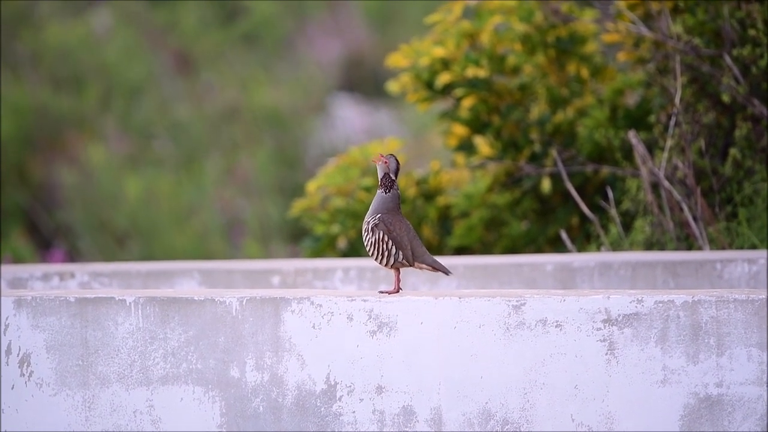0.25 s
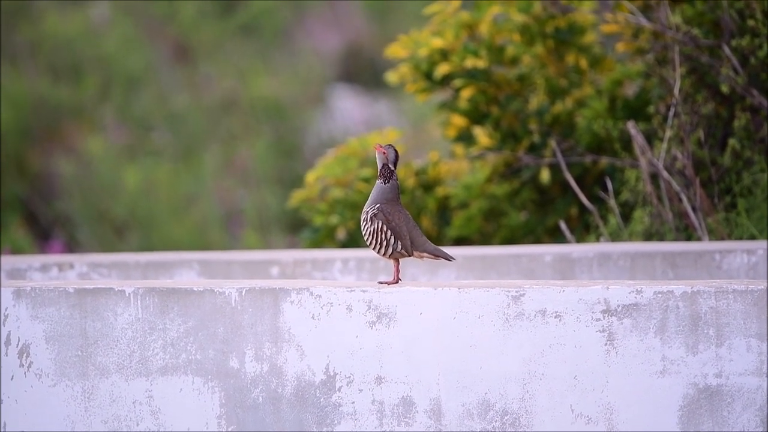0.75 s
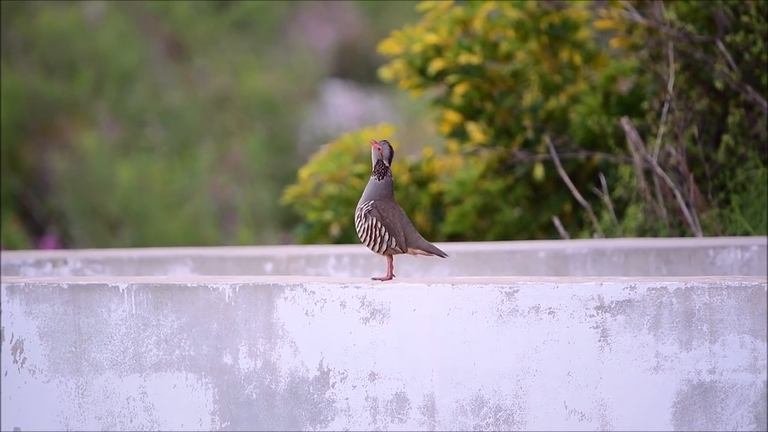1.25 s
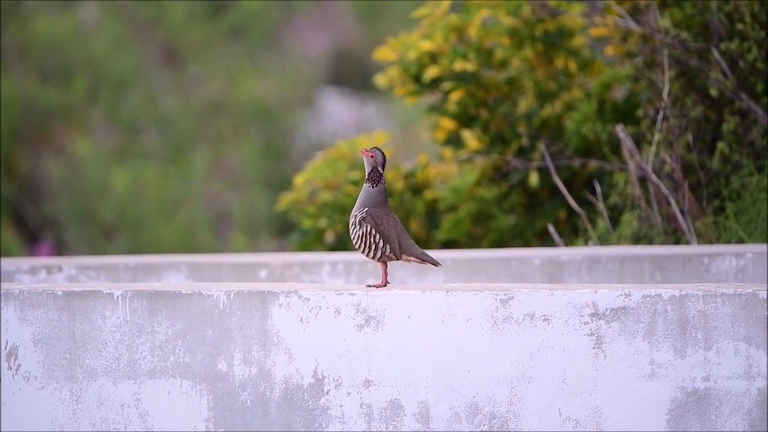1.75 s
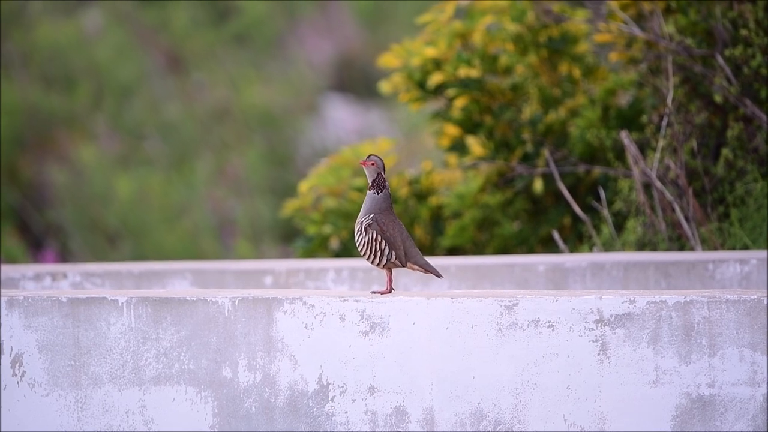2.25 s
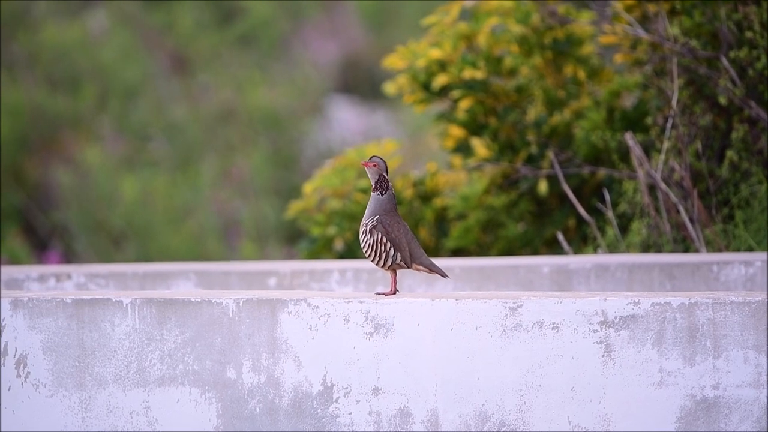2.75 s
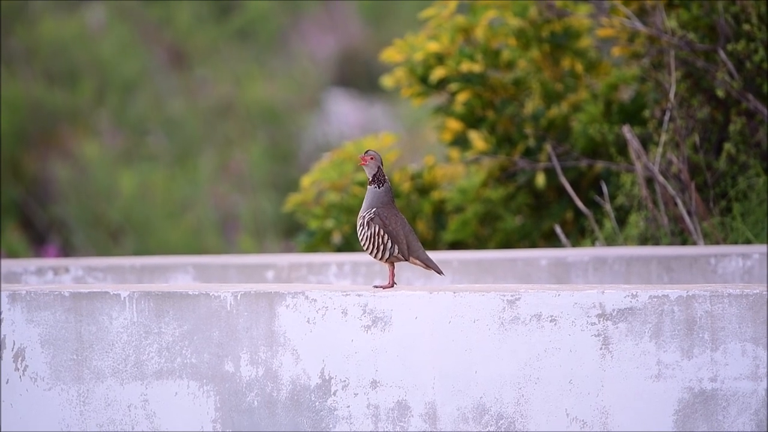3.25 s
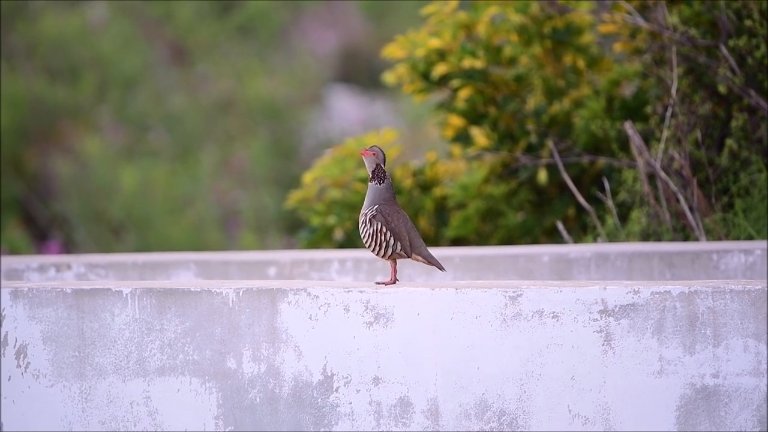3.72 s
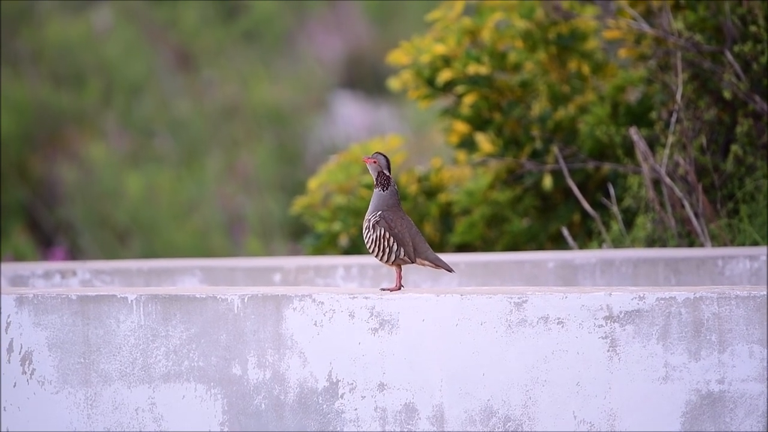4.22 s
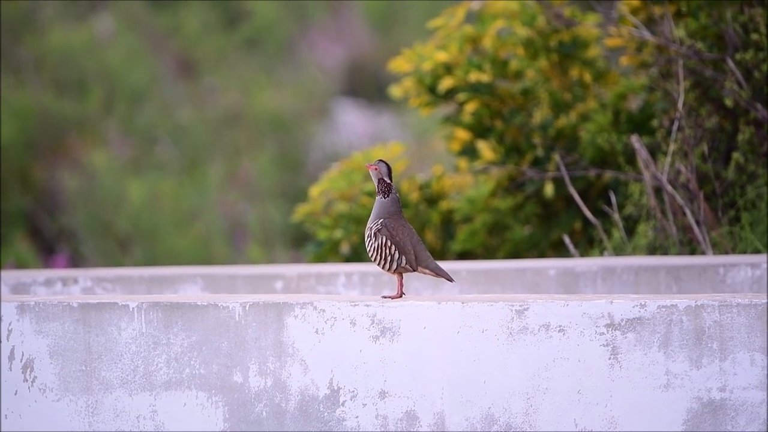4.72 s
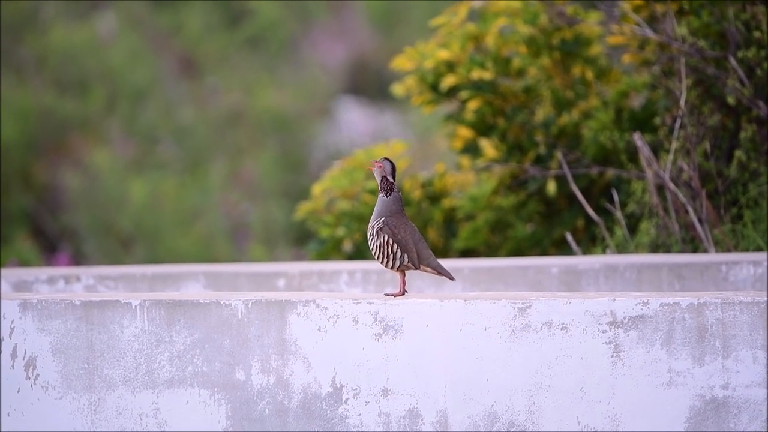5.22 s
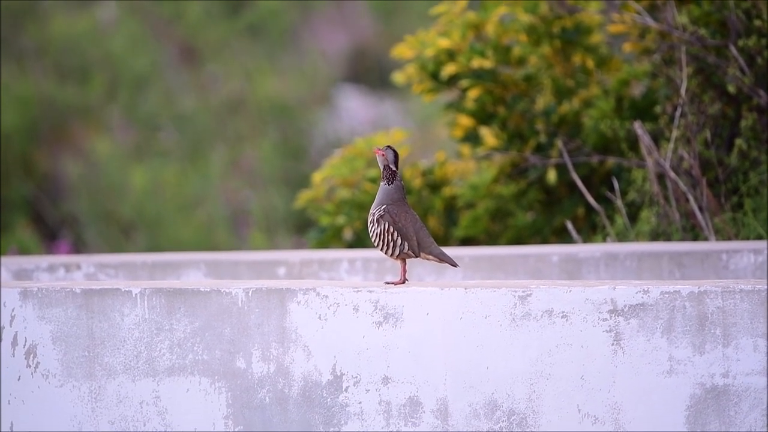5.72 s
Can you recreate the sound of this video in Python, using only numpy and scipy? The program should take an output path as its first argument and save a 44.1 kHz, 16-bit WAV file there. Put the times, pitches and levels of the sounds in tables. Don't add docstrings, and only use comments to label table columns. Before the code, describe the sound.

Outdoors, a partridge gives regular harsh rasp-and-whistle calls with ringing echoes over quiet road hum, hiss and a thin high whine.

```python
import sys
import numpy as np
from scipy import signal
from scipy.fft import rfft, irfft, next_fast_len
from scipy.io import wavfile
from scipy.ndimage import uniform_filter1d, map_coordinates

SR = 44100
rng = np.random.default_rng(int(sys.argv[2]) if len(sys.argv) > 2 else 0)


def waveform_to_disk(signal):
    frames = np.transpose(np.atleast_2d(signal))
    scaled = np.clip(frames, -1, 1) * 32767
    samples = np.round(scaled).astype(np.int16)
    wavfile.write(sys.argv[1], SR, samples)


def natural_amplitude(level_db):
    exponent = np.asarray(level_db, float) / 20
    return 10 ** exponent


N = 263718
LEAD = SR // 4

# f/Hz, level/dB
GRIP_COLOUR = [(5000, 3), (8500, -7), (11000, -8), (13500, 3), (15500, -20)]


def unit(x):
    return x / np.sqrt(np.mean(x ** 2) + 1e-20)


def along(points, hz):
    f, v = np.transpose(points)
    return np.interp(np.log(hz + 1), np.log(f + 1), v)


def filtered(x, response):
    n = x.shape[-1]
    m = next_fast_len(n + 4096)
    return irfft(rfft(x, m) * response(np.fft.rfftfreq(m, 1 / SR)), m)[..., :n]


def resonances(modes, f):
    total = 0
    for k, (centre, width, db) in enumerate(modes):
        total = total + (-1) ** k * natural_amplitude(db) * 1j * f * width / (centre * centre - f * f + 1j * f * width)
    return total


def wobble(rate, size):
    knots = rng.standard_normal(int(size * rate / SR) + 4)
    return map_coordinates(knots, [np.arange(size) * rate / SR])


def left_right(left, right):
    return np.array([[left], [right]])


def add(track, s, sound):
    part = track[..., LEAD + round(s * SR):][..., :sound.shape[-1]]
    part += sound[..., :part.shape[-1]]


def rush(spectrum, patchy_db):
    # f/Hz, correlation
    alike = [(60, 0.9), (130, 0.9), (290, 0.76), (640, 0.6), (1410, -0.019), (3100, -0.21), (6820, 0.013),
             (15000, 0.0068)]
    # f/Hz, level/dB
    tilt = [(60, 0), (110, -1.5), (200, -1.5), (380, -2), (700, -3), (1290, -11.5), (2380, -2.5),
            (4400, -1.5), (8120, 0), (15000, -2)]
    z = signal.stft(rng.standard_normal((2, N)), nperseg=512)[2]
    field = uniform_filter1d(rng.standard_normal(z.shape[1:]), size=5, axis=0)
    field = uniform_filter1d(field, size=14, axis=1)
    pair = signal.istft(z * natural_amplitude(patchy_db * unit(field)), nperseg=512)[1][:, :N]

    def mid_side(hz):
        turn = np.arccos(np.clip(along(alike, hz), -1, 1)) / 2
        return natural_amplitude(along(spectrum, hz)) * [np.cos(turn), np.sin(turn)]

    mid, side = filtered(pair, mid_side)
    lean = lambda hz: natural_amplitude(np.outer([.5, -.5], along(tilt, hz)))
    return unit(filtered(np.array([mid + side, mid - side]), lean))


def traffic():
    # f/Hz, level/dB per Hz
    hum_spectrum = [(15, -13), (40, -4), (65, -5), (115, -5.5), (170, -4), (295, -4.5), (400, -8.5),
                    (680, -6.5), (900, -10), (1180, -11), (1300, -3), (1520, -4), (1620, -45), (2200, -120)]
    # f/Hz, level/dB per Hz
    hiss_spectrum = [(1000, -69), (1550, 2), (2200, -1), (3200, -4.5), (5000, -5), (7000, -14),
                     (11000, -16), (13800, -16), (14700, -21), (15100, -8), (15600, -17)]
    # t/s, level/dB
    road = [(0, -48.5), (1, -50), (2, -49), (3, -48.5), (4, -49), (6, -49.5)]
    s, road_db = np.transpose(road)
    swell = natural_amplitude(np.interp(np.arange(N) / SR, s, road_db))
    hum = rush(hum_spectrum, patchy_db=1.0)
    low = filtered(hum, lambda f: 1 / (1 + (f / 450) ** 4))
    layers = natural_amplitude(-0.8) * unit(low) + natural_amplitude(3.5) * unit(hum - low)
    return swell * layers + natural_amplitude(-56.0) * rush(hiss_spectrum, patchy_db=.5)


def drones():
    # f/Hz, width/Hz, level/dB
    road_tones = [(114.2, 23, -55.5), (290.4, 14.6, -61.5), (691, 44.5, -54.5), (878, 11, -74),
                  (1059.5, 40, -58.5)]

    def bands(f):
        return sum(natural_amplitude(db) * np.sqrt(1500 / w) * np.exp(-((f - hz) / w) ** 2) for hz, w, db in road_tones)

    return filtered(rush([(50, 0), (1500, 0), (1600, -120)], patchy_db=2), bands)


def whine():
    # f/Hz, level/dB rms
    tones = [(15635, -54.5)]
    hz, db = tones[0]
    phase = 2 * np.pi * hz * np.arange(N) / SR + .1 * wobble(20, N)
    level = natural_amplitude(db + 0.3 * wobble(0.39, N) + .35 * wobble(130, N))
    return np.sqrt(2) * level * natural_amplitude(left_right(2.9, -4.2)) * np.sin(phase + left_right(.25, -.25))


def handling():
    # t/s, peak level/dB, f/Hz, t60/s, left minus right/dB
    knocks = [
        (3.4241, -31, 1474, 0.027, -25),
        (3.456, -21.5, 1330, 0.0048, -36),
        (3.491, -22, 1460, 0.024, -24.5),
        (5.8165, -34, 1330, 0.039, -18),
    ]
    # t/s, peak level/dB, left minus right/dB
    ticks = [
        (3.425, -37, -13),
        (3.454, -46, -8),
        (3.461, -43, -8),
        (3.481, -36, -17),
    ]
    # start t/s, length/s, level/dB
    stroke = (3.40, 0.097, -50.5)
    body, t = np.zeros((2, LEAD + N)), np.arange(SR // 20) / SR
    for s, db, hz, t60_s, pan_db in knocks:
        ring = natural_amplitude(db - 60 * t / t60_s) * (1 - np.exp(-t / 0.0016)) * np.sin(2 * np.pi * hz * t)
        add(body, s, natural_amplitude(left_right(pan_db / 2, -pan_db / 2)) * ring)
    for s, db, pan_db in ticks:
        burst = natural_amplitude(-60 * t / 0.0074) * rng.standard_normal(len(t))
        snap = filtered(burst, lambda f: natural_amplitude(along(GRIP_COLOUR, f)) * (f > 4000))
        add(body, s, natural_amplitude(db + left_right(pan_db / 2, -pan_db / 2)) * snap / np.abs(snap).max())
    start_s, length_s, rub_db = stroke
    n = round(length_s * SR)
    rub = np.hanning(n) * natural_amplitude(5 * wobble(300, n)) * rng.standard_normal((2, n))
    add(body, start_s, natural_amplitude(rub_db) * filtered(rub, lambda f: natural_amplitude(along(GRIP_COLOUR, f)) * (f > 5500)))
    return body[:, LEAD:]


def calls():
    # start t/s, slide t/s, opening rasp length/s, whistle level/dB, rasp level/dB
    light = [
        (-.150, -0.089, 0.027, -28, -30),
        (0.947, 1.011, 0.033, -28, -34.5),
        (2.101, 2.162, .016, -42.5, -36.5),
        (3.284, 3.341, 0.015, -40, -35.5),
        (4.442, 4.501, 0.017, -40, -36),
        (5.897, 5.96, 0.024, -38.5, -37),
    ]
    # start t/s, slide t/s, top f/Hz, hold/s, level/dB
    gruff = [
        (0.285, 0.323, 4400, 0.02, -23.5),
        (1.359, 1.396, 3760, 0.0099, -23.5),
        (5.266, 5.303, 4187, .014, -25),
    ]
    # start t/s, slide t/s, top f/Hz, hold/s, level/dB
    clear = [
        (3.71, 3.745, 4233, 0.021, -22.5),
        (4.861, 4.898, 4205, .022, -24.5),
    ]
    # start t/s, slide t/s, top f/Hz, hold/s, level/dB
    steady = [
        (2.533, 2.561, 4195, .013, -27),
    ]
    rows = []
    for s, at, length, db, rasp_db in light:
        over_faint_db = db + 42
        top_hz = 5110 + 4 * over_faint_db
        hold = .024 + .45 * length
        slide_db = rasp_db + 9.5 - 0.42 * over_faint_db
        rows.append(("light", s, at, top_hz, hold, db, slide_db, rasp_db, length))
    full_hold_s, loss_db_per_s, overlap_s = .024, 1100, .006
    for kind, table in (("gruff", gruff), ("clear", clear), ("steady", steady)):
        for s, at, top_hz, hold, db in table:
            slide_db = db - loss_db_per_s * (full_hold_s - hold)
            rows.append((kind, s, at, top_hz, hold, db, slide_db, db, at - s - hold + overlap_s))
    return sorted(rows, key=lambda row: row[1])


def whistle(hold, top_hz, hold_db, slide_db, overtone_db, below):
    slide_s, end_hz = .008, 3450
    t = np.arange(round((hold + slide_s) * SR)) / SR
    climb = 1 - below * np.exp(-t / .004)
    down = np.clip((t - hold) / slide_s, 0, 1)
    hz = climb * (top_hz + (end_hz - top_hz) * down ** .7) * (1 + .004 * wobble(300, len(t)))
    phase = 2 * np.pi * np.cumsum(hz) / SR
    steps_s = [0, .6 * hold, hold, hold + .4 * slide_s, hold + slide_s]
    swell_db = np.interp(t, steps_s, [hold_db - 11, hold_db, hold_db - 3, slide_db, slide_db - 6])
    edges = np.clip(np.minimum(t, t[::-1]) / .0015, 0, 1)
    overtone = natural_amplitude(overtone_db - 6 * down - 14 * np.exp(-t / (.3 * hold))) * np.sin(2 * phase)
    return np.sqrt(2) * edges * natural_amplitude(swell_db + 1.2 * wobble(250, len(t))) * (np.sin(phase) + overtone)


def rasp(length, rate_hz, rough, db, throat, hiss_db, opening):
    # f/Hz, width/Hz, level/dB
    throat_low = [(1790, 1050, -3.5), (2690, 1510, 2.5), (3223, 942, 6.5), (3890, 870, 1.5),
                  (5330, 1160, -13)]
    # f/Hz, width/Hz, level/dB
    throat_high = [(2007, 500, -16.5), (3598, 397, -0.5), (4190, 516, 4.5), (5120, 1070, -3),
                   (7080, 1500, -16), (10300, 1100, -25.5)]
    # f/Hz, width/Hz, level/dB
    beak = [(6750, 1300, -2.5), (9100, 3600, -6.5), (11560, 2000, -8)]
    n = round((length + .01) * SR)
    t, throat = np.arange(n) / SR, np.clip(throat, 0, 1)
    broken = t / .014
    if opening:
        rough = rough * np.clip(broken, min(2.6 * throat - .6, 1), 1.3) ** 1.5
        shape = np.interp(t / length, [0, .15, .7, 1], [0, .5, 1, 0])
    else:
        shape = np.interp(t / length, [0, .15, .7, 1], [0, .85, .85, 0])
    climb = .45 * (1 - throat) ** 2 * np.minimum(broken, 1)
    cycle = np.cumsum(rate_hz * (1 + climb + .3 * rough * wobble(600, n))) / SR
    slaps = np.exp(16 * (np.cos(2 * np.pi * cycle) - 1)) * natural_amplitude(5 * rough * wobble(700, n))
    slaps = slaps * (1 + .8 * np.clip(broken - .5, 0, 1) * (throat < .42) * np.cos(np.pi * cycle))
    air = unit((.5 + unit(slaps)) * rng.standard_normal(n))
    source = unit(slaps - slaps.mean()) + 1.05 * rough * air

    def tract(f):
        modes = (1 - throat) * resonances(throat_low, f) + throat * resonances(throat_high, f)
        return modes * (1j * f / 1400) ** 2 / (1 + 1j * f / 1400) ** 2 / (1 + 1j * f / 7000) ** 2

    breath = shape ** 2 * (.5 * air + rng.standard_normal(n))
    hiss = filtered(breath, lambda f: resonances(beak, f) * (f < 13000))
    return natural_amplitude(db) * (unit(filtered(shape * source, tract)) + natural_amplitude(hiss_db) * unit(hiss))


def tail(decays, onset):
    hz, t, z = signal.stft(rng.standard_normal((2, SR)), SR, nperseg=256)
    x = signal.istft(z * natural_amplitude(-60 * t / along(decays, hz)[:, None]), SR, nperseg=256)[1]
    n = x.shape[1]
    x = x * np.clip(np.arange(n) / SR / onset, 0, 1) * natural_amplitude(0.5 * wobble(94, n))
    return x / np.linalg.norm(x[0])


def surroundings(voice):
    # f/Hz, t60/s
    near = [(1500, 0.091), (4000, 0.31), (8000, 0.28), (12000, 0.19)]
    # f/Hz, t60/s
    far = [(1500, 0.72), (2500, 0.98), (4200, 1), (6000, 0.88), (10000, 0.64)]
    # delay/s, left level/dB, right level/dB
    walls = [(.009, -37, -38), (.0175, -6.5, -31), (.025, -16, -12), (.033, -39, -11), (.045, -35, -21),
             (.135, -45, -16.5)]
    heard = np.zeros((2, LEAD + N))
    for _, _, at, *_ in calls():
        start_s = at - .075
        call = voice[LEAD + round(start_s * SR):][:round(.15 * SR)]
        echoes = natural_amplitude(1.0) * tail(near, onset=0.0017) + natural_amplitude(-3.5) * tail(far, onset=0.028)
        add(heard, start_s, signal.fftconvolve(call[None], echoes, axes=1))
    for delay_s, left_db, right_db in walls:
        add(heard, delay_s - LEAD / SR, natural_amplitude(left_right(left_db, right_db)) * voice)
    return filtered(heard, lambda f: 1 / (1 + (1j * f / 13000)))


def partridge():
    opening = {"light": (1238, 0.54, -4, 0.28, -33), "gruff": (854.5, 0.32, -9.5, 0.7, -24.5),
               "clear": (871, .5, -13, 0.66, -28), "steady": (759.5, .55, -9, .47, -27)}
    closing = {"light": (0.0178, 854.5, 0.6, 0.4, 0.6, -21.5), "gruff": (0.044, 690, 0.88, -8.5, .67, -20),
               "clear": (.031, 825, 0.64, -6.5, 0.8, -20), "steady": (.042, 858, 0.47, -4, 0.73, -20)}
    close_after_s = {"light": .005, "gruff": .0015, "clear": .0015, "steady": -.001}
    overtone_db = {"light": -24.5, "gruff": -19.5, "clear": -26.5, "steady": -28}
    climb = {"light": .08, "gruff": .05, "clear": .17, "steady": .17}
    beamed_db = {"light": -5, "gruff": -.1, "clear": -.1, "steady": -3}
    voice, beam = np.zeros(LEAD + N), np.zeros(LEAD + N)
    for kind, s, at, top_hz, hold, db, slide_db, rasp_db, length in calls():
        tone = whistle(hold, top_hz, db, slide_db, overtone_db[kind], climb[kind])
        spread = natural_amplitude(beamed_db[kind])
        add(voice, at - hold, spread * tone)
        add(beam, at - hold, (1 - spread) * tone)
        rate_hz, rough, over_db, *colour = opening[kind]
        add(voice, s, rasp(length, rate_hz, rough, rasp_db + over_db, *colour, opening=True))
        length, rate_hz, rough, over_db, *colour = closing[kind]
        last = rasp(length, rate_hz, rough, rasp_db + over_db, *colour, opening=False)
        add(voice, at + close_after_s[kind], last)
    direct = natural_amplitude(left_right(-1.1, .4)) * (voice + beam)
    return (surroundings(voice) + direct)[:, LEAD:]


def scene():
    return traffic() + drones() + whine() + handling() + partridge()


def band_limit(x):
    return signal.sosfilt(signal.butter(12, 16280, fs=SR, output="sos"), x)


def record(dry):
    mix = filtered(dry, lambda f: f < 15800)
    return band_limit(mix)


dry = scene()
out = record(dry)
waveform_to_disk(out)
```